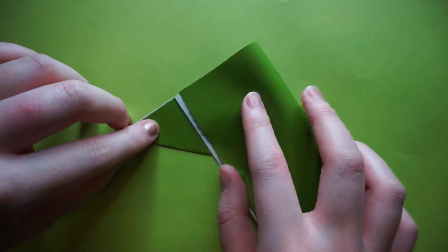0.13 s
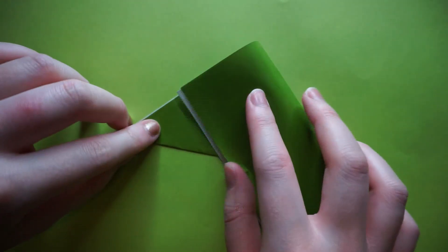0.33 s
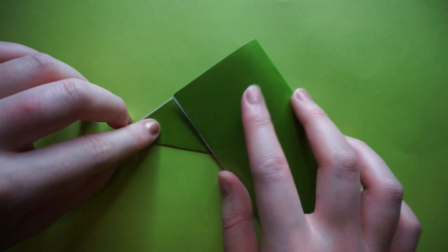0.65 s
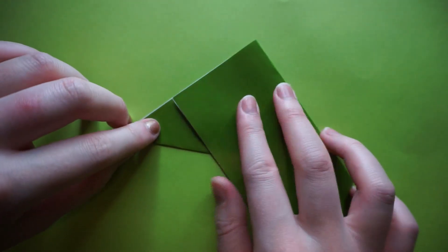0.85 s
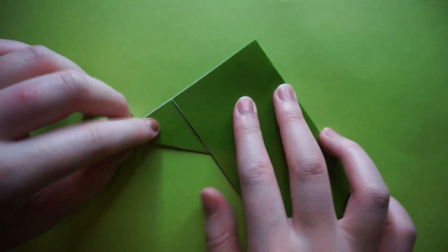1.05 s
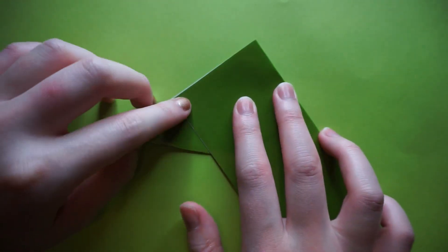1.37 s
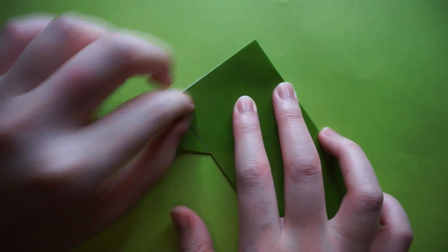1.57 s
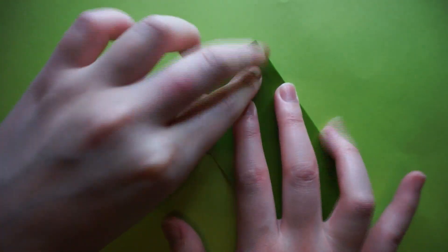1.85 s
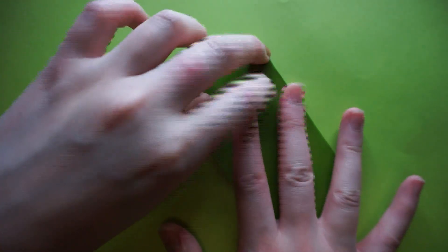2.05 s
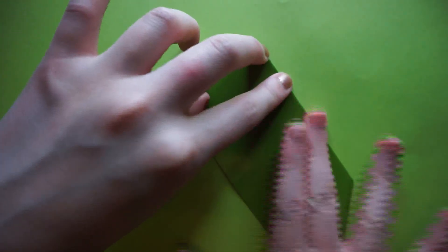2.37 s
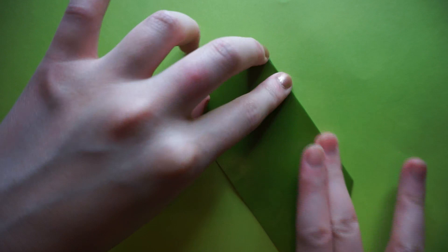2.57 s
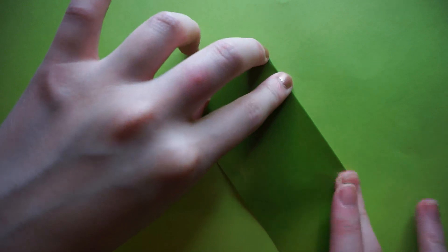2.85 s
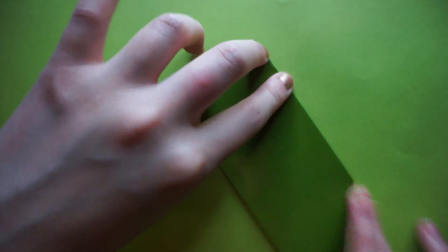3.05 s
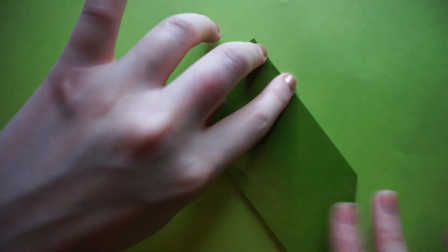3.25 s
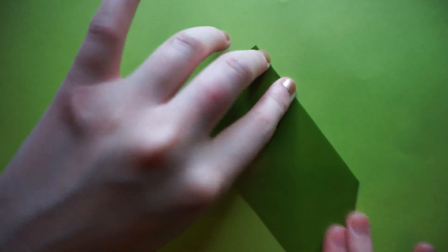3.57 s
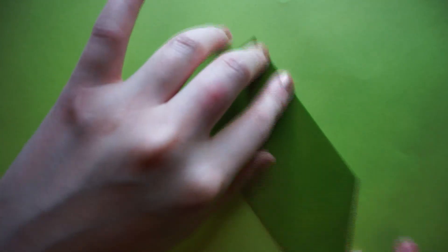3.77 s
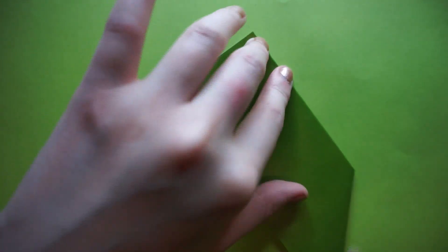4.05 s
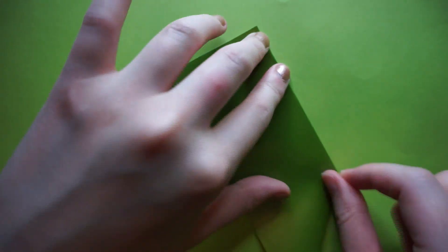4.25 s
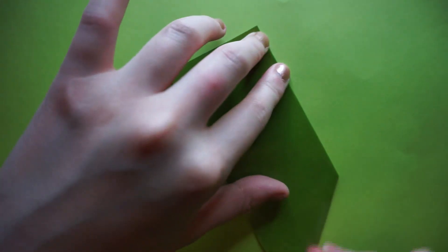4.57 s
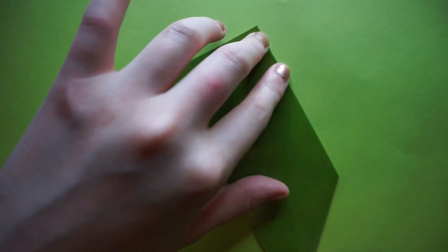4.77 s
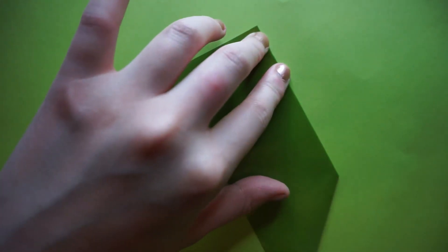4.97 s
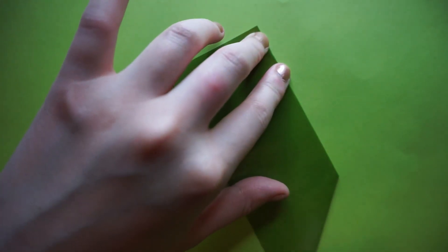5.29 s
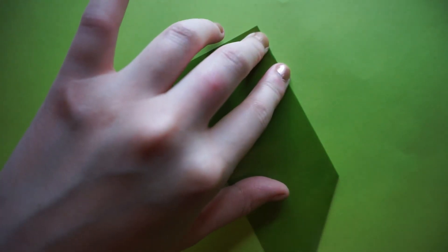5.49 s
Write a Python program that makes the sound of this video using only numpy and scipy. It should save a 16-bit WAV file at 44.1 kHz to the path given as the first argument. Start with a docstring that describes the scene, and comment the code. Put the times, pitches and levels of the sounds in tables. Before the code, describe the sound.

A quiet room with low steady hiss, heard close in stereo. From 0 to 0.8 s a paper flap drags in faint, grainy catches with small papery ticks, loudest near 0.6 s. Then it is almost still, with a tick at 1.15 s and a soft hiss swelling around 1.6 s. From 1.9 to 2.4 s fingers press: a cluster of dry ticks, dull low pats, the firmest at 2.16 s, short skin hisses and a sharp bright snap at 2.34 s. Hiss fades until brief brushes at 3.1 and 3.4 s. A rapid stutter at 3.45 s precedes the loud zip at 3.59-3.77 s, a ragged, buzzing nail scrape, starting squeaky and bright, dying dull. A thin rasp follows at 3.82 s. Soft slides, ticks at 4.23 s and breathy edge whistles from 4.3 to 4.9 s continue; sliding stops at 5.1 s, with a crisp tick and light pat at 5.31 s.

```python
"""Hands fold a sheet of origami paper on a table, close up in a quiet room, over a steady room tone.
First a flap is eased flat: it drags in tiny catches, and the paper ticks as it buckles.
Then skin hisses over the fibres, whistles faintly on the folded edge, and presses and pats the table.
After a few hesitant slips a fingernail runs once along the crease, sticking and slipping in a loud zip.
A fingertip brushes off its end in a bright rasp; more slides, edge whistles, ticks and pats follow."""
import sys
import numpy as np
from scipy import signal
from scipy.fft import rfft, irfft, next_fast_len
from scipy.io import wavfile

SR = 44100
rng = np.random.default_rng(int(sys.argv[2]) if len(sys.argv) > 2 else 0)


def pcm_store(signal):
    """Save signal as 16-bit PCM."""
    levels = np.round(np.clip(np.atleast_2d(signal), -1, 1) * 32767)
    wavfile.write(sys.argv[1], SR, levels.astype(np.int16).T)


N = 248283
TIME = np.arange(N) / SR

# resonances of the paper pocket under the flap: f/Hz, width/Hz, level/dB
POCKET_MODES = [(1680, 280, 0), (2650, 450, -2), (6000, 3000, -18), (8300, 900, -15)]
# modes of the table top, the first two being its thump: f/Hz, width/Hz, level/dB
TABLE_TOP = [(112, 40, 1), (147, 35, 4), (205, 35, 2), (260, 55, 2), (378, 55, -3), (470, 70, -15),
             (680, 110, -7), (1100, 600, -8)]
# treble colour of the sharp edge of each slip: f/Hz, relative density/dB per Hz
SLIP_COLOUR = [(70, -29), (700, -4), (2000, 5.5), (5900, 7), (6700, 15.5), (8000, 9), (9400, 6),
               (12900, 6.5), (14300, 1), (15500, -9)]
# the nail bites at the start of the crease, then comes to rest
NAIL_START_S, NAIL_STOP_S = 3.5885, 3.83


def from_db(db):
    """Decibels to gain."""
    return 10 ** (np.asarray(db) / 20)


def rms_one(x):
    """Scale to unit rms."""
    return x / np.sqrt(np.mean(x ** 2) + 1e-20)


def in_time(rows):
    """Each column of a curve, interpolated at every sample."""
    s, *columns = np.transpose(rows)
    return [np.interp(TIME, s, column) for column in columns]


def at_hz(points, hz):
    """Read a spectrum on a log-frequency axis."""
    f, value = np.transpose(points)
    return np.interp(np.log(np.maximum(hz, 1)), np.log(f), value)


def convolve(x, response):
    """Pass a sound through an impulse response, channel by channel."""
    return signal.fftconvolve(np.atleast_2d(x), np.atleast_2d(response), axes=-1)[:, :N]


def butter(x, order, hz, kind):
    """Butterworth filter: "low", "high" or "band"."""
    return signal.sosfilt(signal.butter(order, hz, kind, fs=SR, output="sos"), x)


def causal_filter(spectrum, size=1024):
    """Minimum-phase impulse response of unit energy with the given spectrum."""
    level_db = at_hz(spectrum, np.linspace(0, SR / 2, size + 1))
    cepstrum = irfft(np.log(from_db(level_db)))
    # folding the cepstrum forward in time makes the phase minimal
    cepstrum[1:size] *= 2
    cepstrum[size + 1:] = 0
    response = irfft(np.exp(rfft(cepstrum)))
    return response / np.linalg.norm(response)


def resonate(x, hz, width):
    """A two-pole resonance with unit gain on top."""
    r = np.exp(-np.pi * abs(width) / SR)
    zeros = np.array([1, 0, -1]) * (1 - r * r) / 2
    poles = [1, -(1 + r * r) * np.cos(2 * np.pi * hz / SR), r * r]
    return signal.lfilter(zeros, poles, x)


def body(modes, size=2048):
    """Unit-energy impulse response of parallel resonances."""
    click = signal.unit_impulse(size)
    response = sum(from_db(db) * resonate(click, hz, width) for hz, width, db in modes)
    return response / np.linalg.norm(response)


def drift(per_s):
    """Random wander of unit rms, with the given number of fresh values per second."""
    knots = rng.standard_normal(N // 4)
    return rms_one(np.interp(TIME * per_s, np.arange(len(knots)), knots))


def stereo_noise(spectrum):
    """Coloured noise of unit rms whose left-right likeness varies with pitch."""
    # left-right likeness of the steady noises: f/Hz, likeness (0-1)
    likeness = [(100, 0.89), (400, 0.09), (1200, 0.022), (4000, 0.2), (8000, 0.43), (13000, 0.29)]
    hz = np.linspace(0, SR / 2, next_fast_len(N, True) // 2 + 1)
    white = rng.standard_normal((2, 2 * len(hz) - 2))
    mid, side = rfft(white) * from_db(at_hz(spectrum, hz))
    alike = np.clip(at_hz(likeness, hz), 0, .99)
    both = np.sqrt(1 + alike) * mid + np.sqrt(1 - alike) * side * [[1], [-1]]
    return rms_one(irfft(both)[:, :N])


def pan(left_db):
    """Gains of the two channels; left_db is how far left stands above right."""
    return from_db(np.array([[left_db], [-left_db]]) / 2)


def swell(start_s, rise_s, length_s, fade_s=None):
    """Gain of one rub: it rises, holds to the end of its length, then falls 20 dB per fade time."""
    # by default the fade time is 36 ms plus a share of the rub's own length
    fade_s = fade_s or 0.036 + 0.79 * length_s
    age = TIME - start_s
    return np.clip(age / rise_s, 0, 1) * from_db(-20 * np.clip((age - length_s) / fade_s, 0, 10))


def table_rumble(band_hz):
    """Skin judders on the paper and keeps the modes of the table top murmuring; unit rms."""
    waver_db = 2.5
    force = butter(rng.standard_normal(N), 2, band_hz, "band")
    return rms_one(convolve(force * from_db(waver_db * drift(15)), body(TABLE_TOP)))


def room_tone(level_db):
    """Steady coloured noise of the quiet room."""
    # colour of the room tone: f/Hz, relative density/dB per Hz
    tone_colour = [(12, -64), (20, -26), (120, -6), (574, -9), (1440, -10), (3440, -13.5), (7730, -15.5),
                   (16000, -20)]
    return from_db(level_db) * stereo_noise(tone_colour)


def flap(grain_db, side_db):
    """The flap drags on the layer below in tiny catches that ring the pocket of paper under it."""
    # rubs of the flap: start t/s, length/s, level/dB
    flap_rubs = [(0.0, 0.032, -58.5), (0.044, 0.048, -59), (0.167, 0.022, -60), (0.268, 0.024, -62),
                 (0.307, 0.021, -53.5), (0.501, 0.1, -59.5), (0.726, 0.13, -67.5)]
    rise_share, fade_s = 0.38, 0.035
    # the upper resonances grow relative to the lowest as the flap closes
    upper_db, upper_db_per_s = -13.5, 22
    drag = sum(from_db(db) * swell(s, rise_share * length, length, fade_s)
               for s, length, db in flap_rubs)
    catches = drag * rng.standard_normal(N) * rms_one(from_db(grain_db * drift(350)))
    last_rub_s = flap_rubs[-1][0]
    upper = from_db(upper_db + upper_db_per_s * np.minimum(TIME, last_rub_s))
    lowest_ring = convolve(catches, body(POCKET_MODES[:1]))
    upper_ring = convolve(catches * upper, body(POCKET_MODES[1:]))
    return (lowest_ring + upper_ring) / np.hypot(1, upper) * pan(side_db)


def ticks(settle_s, rattle, spread, crack, level_db, size=1024):
    """A buckle snaps, rattles for a millisecond at its own pitch and rings the pocket under the flap."""
    # paper buckling and snapping: t/s, level over a millisecond/dB before level_db, ring f/Hz,
    # nominal ring width/Hz, left over right/dB, pocket ring relative to the snap/dB
    snaps = [(0.099, -40, 2160, 1000, -2, 2), (0.3382, -40.5, 1770, 200, -2, -11),
             (0.4735, -47, 1900, 900, 0, -16), (0.5782, -38, 4450, 5500, -7, -1.5),
             (0.605, -33.5, 1690, 900, -6, 2), (0.6067, -38.5, 7050, 2500, -4, 4),
             (0.747, -46, 2840, 1300, -10, -11), (1.148, -29.5, 7600, 3540, -7.5, -15.5),
             (1.653, -40.5, 1880, 970, 2, -25), (1.826, -33, 6850, 1900, -5, -41),
             (1.9096, -40, 3930, 2500, 2, -4), (1.9806, -35.5, 4000, 1800, 7, -15),
             (1.986, -38, 4330, 1600, -8, -11), (2.006, -35, 3960, 2700, -1, -10),
             (2.017, -34, 4050, 3020, -1, -16), (2.044, -35, 5530, 3000, 0, -3.5),
             (2.076, -31.5, 5100, 3060, -2, -1.5), (2.246, -39, 5800, 3000, 1, -3.5),
             (2.2905, -47.5, 6250, 4160, -4, 1), (2.3364, -18, 6200, 2000, -2, -34),
             (3.245, -35.5, 4120, 1500, 2, -16.5), (3.406, -31, 2800, 2420, -1.5, -11),
             (3.5278, -33.5, 7800, 6400, -3, -3.5), (4.226, -27.5, 6300, 1160, 1, -20),
             (4.2354, -31, 5060, 3100, -3, -5.5), (5.3097, -26, 11700, 2600, -4.5, -15.5),
             (5.3098, -31, 6800, 4000, -1, -38), (5.3182, -33, 6040, 3600, 3, -9)]
    out, age = np.zeros((2, N + size)), np.arange(size) / SR
    pocket = body(POCKET_MODES)
    for s, db, hz, width, side_db, pocket_db in snaps:
        shared, *own = rng.standard_normal((3, size))
        rattling = (shared + spread * np.array(own)) * np.exp(-age / settle_s)
        kick = signal.unit_impulse(size) + rattle * rattling
        ring = resonate(resonate(kick, hz, 0.95 * width), hz, 6 * width)
        snap = rms_one(ring + crack * kick)
        snap = snap + from_db(pocket_db) * rms_one(convolve(kick, pocket)[:, :size])
        # the level counts over one millisecond
        gain = from_db(db + level_db) * pan(side_db) * np.sqrt(SR / 1000 / size)
        start = int(s * SR)
        out[:, start:start + size] += gain * snap
    return out[:, :N]


def fibre_catches():
    """Single fibres catch in tiny random clicks, mostly small and now and then larger; unit rms."""
    per_s, spread_db = 900, 4.5
    sizes = from_db(spread_db * np.minimum(rng.exponential(1, N), 4))
    signs = rng.choice([-1, 1], N)
    return rms_one(sizes * signs * (rng.random(N) < per_s / SR))


def fingers(sheen_side_db):
    """Skin catches on paper fibres: a grainy hiss above, the table's rumble below."""
    # fingers sliding on paper: start t/s, rise/s, length/s, hiss level/dB,
    # top octave relative to the hiss/dB, table rumble level/dB
    slides = [(1.01, .005, 0.11, -63, -1, -93), (1.532, 0.16, 0.18, -56, -2.5, -66),
              (1.888, 0.025, 0.22, -59, -6, -75), (2.166, 0.017, 0.013, -46, -7.5, -53),
              (2.222, 0.0042, 0.015, -48, -8, -53), (2.28, 0.0076, 0.048, -49.5, -6.5, -62),
              (2.323, 0.017, 0.078, -44, -2, -80), (2.394, 0.035, 0.13, -51.5, -3.5, -64.5),
              (2.601, 0.029, 0.21, -58.5, -3, -64.5), (2.975, 0.027, 0.17, -65, -4, -69),
              (3.109, 0.011, .012, -45, 1.5, -60), (3.353, 0.013, 0.039, -49.5, -5, -62.5),
              (3.429, 0.011, 0.1, -49, -5, -55), (3.538, 0.11, 0.038, -33.5, -7, -53),
              (3.892, 0.01, 0.11, -53, -3, -65.5), (4.156, 0.0045, 0.05, -51.5, 1.5, -71),
              (4.22, 0.0099, 0.04, -46, -3.5, -72), (4.279, 0.17, 0.37, -54, -3, -69),
              (4.633, 0.15, 0.14, -58.5, 9, -71), (4.826, 0.028, 0.098, -54.5, -4, -70),
              (4.959, 0.048, 0.15, -56, 1, -70.5), (5.083, 0.0025, 0.029, -46.5, -1, -83),
              (5.328, 0.068, 0.11, -60.5, -2, -79)]
    # colour of skin on paper: f/Hz, relative density/dB per Hz
    hiss_colour = [(500, -11), (1100, -7.5), (2000, -6.5), (3000, -6.5), (3900, -2.5), (5400, -2),
                   (6800, 3), (7800, 3.5), (9000, -9.5), (11000, -18), (15000, -62)]
    # colour of its top octave: f/Hz, relative density/dB per Hz
    sheen_colour = [(7000, -68), (9500, -7.5), (11000, -4), (13200, -2), (16000, -12)]
    # the sliding finger leaves the paper, and its hiss and rumble stop quickly
    lift_s, lift_fade_s = 5.1, .006
    flutter_db, wander_db, fibre_db = .9, .9, -4
    power = np.zeros((3, N))
    lifted = np.exp(-np.maximum(TIME - lift_s, 0) / lift_fade_s)
    for s, rise, length, hiss_db, top_db, rumble_db in slides:
        gain = swell(s, rise, length) * (lifted if s < lift_s else 1)
        power += np.outer(from_db([hiss_db, hiss_db + top_db, rumble_db]), gain) ** 2
    hiss, sheen, rumble = np.sqrt(power)
    # the hiss flutters quickly and wanders slowly
    grip = rms_one(from_db(flutter_db * drift(90) + wander_db * drift(22)))
    catches = from_db(fibre_db) * fibre_catches()
    low, high = (rms_one(stereo_noise(colour) + convolve(catches, causal_filter(colour)))
                 for colour in (hiss_colour, sheen_colour))
    friction = grip * (hiss * low + sheen * high * pan(sheen_side_db))
    return friction + rumble * table_rumble(band_hz=(240, 520))


def edge(width_hz, side_db):
    """Skin on the folded edge excites a narrow paper resonance, at a pitch that depends on the spot."""
    # faint whistles of the edge: start t/s, rise/s, length/s, level/dB, f/Hz
    edge_rubs = [(1.012, 0.01, 0.16, -69, 7800), (4.33, 0.18, 0.19, -53.5, 6640),
                 (4.476, 0.1, 0.095, -56, 7700), (4.648, 0.022, 0.027, -54, 7100),
                 (4.816, 0.059, 0.053, -49.5, 7000)]
    out = 0
    for s, rise, length, db, hz in edge_rubs:
        mid, side = resonate(rng.standard_normal((2, N)), hz, width_hz)
        whistle = rms_one(mid + 0.1 * side * np.array([[1], [-1]]))
        out = out + from_db(db) * swell(s, rise, length) * whistle
    return out * pan(side_db)


def presses():
    """The shifting weight of heel and fingers keeps the table rumbling between pats."""
    # shifts of the hand's weight: start t/s, rise/s, length/s, level/dB
    weight_shifts = [(1.905, .01, 0.023, -56), (1.992, 0.011, 0.047, -55.5), (2.048, 0.022, 0.085, -64),
                     (2.181, .01, 0.078, -58.5)]
    weight = sum(from_db(db) * swell(s, rise, length) for s, rise, length, db in weight_shifts)
    return weight * table_rumble(band_hz=(75, 380))


def pats(push, size=8192):
    """A fingertip gives the table top one soft push, then settles against it."""
    # fingertips landing: t/s, level over the decay time/dB, decay time/s,
    # brightness f/Hz, extra level of the low thump modes/dB
    landings = [(1.91, -47, 0.012, 554, 6), (1.981, -50.5, 0.025, 367, 14), (2.012, -49, 0.0082, 650, 0),
                (2.083, -50.5, 0.02, 860, -5), (2.164, -36, 0.0073, 386, 3), (2.335, -48, 0.0083, 600, 5),
                (3.37, -50.5, 0.01, 450, -11), (3.593, -36.5, 0.0027, 560, -14),
                (3.817, -45.5, 0.01, 382, -11), (4.2352, -55, 0.0052, 1600, 6),
                (5.312, -56, 0.0087, 1200, -7), (5.3203, -44, 0.011, 2020, 4)]
    # the table top radiates little below this
    low_hz = 65
    out, age = np.zeros(N + size), np.arange(size) / SR
    for s, db, decay_s, bright_hz, thump_db in landings:
        settling = rng.standard_normal(size) * np.exp(-age / decay_s)
        force = push * signal.unit_impulse(size) + settling / np.linalg.norm(settling)
        force = butter(force, 2, [low_hz, max(bright_hz, 2 * low_hz)], "band")
        thud = sum(from_db(mode_db + thump_db * (k < 2)) * resonate(force, hz, width)
                   for k, (hz, width, mode_db) in enumerate(TABLE_TOP))
        start = int(s * SR)
        out[start:start + size] += from_db(db) * thud / np.linalg.norm(thud) * np.sqrt(decay_s * SR)
    return out[:N]


def sheet(kicks, size=2048):
    """The sheet rings under the nail; its resonances trade strength as the nail travels the crease."""
    # the sheet pressed on the table: f/Hz, width/Hz, then level/dB at the start of the crease,
    # level/dB halfway, level/dB at its end
    sheet_modes = [(237, 74, -4, 2, 7), (393, 63, 6, 0.5, -7.5), (686, 89, 6.5, 7.5, 8.5),
                   (946, 95, -4, -2, 14), (1238, 240, 7, 11.5, 11.5), (1690, 250, 1.5, 5.5, 11),
                   (2170, 410, 7.5, 4, -1), (2820, 400, -16, -4, -8), (3620, 260, 3, 4.5, 14),
                   (4260, 120, 2, 9, -10), (5030, 320, 2, 2, -23)]
    travel_s = .17
    along = (TIME - NAIL_START_S) / travel_s
    click = signal.unit_impulse(size)
    average = sum(from_db(np.mean(dbs)) * resonate(click, hz, width) for hz, width, *dbs in sheet_modes)
    rings = 0
    for hz, width, *dbs in sheet_modes:
        drive = kicks * from_db(np.interp(along, [0, .5, 1], dbs))
        rings = rings + resonate(drive + 1e-18, hz, width)
    return rings / np.linalg.norm(average)


def stutter(settle_s, spread, count=7, size=256):
    """First hesitant slips as the nail sets off: short scrapes, ever wider apart and louder."""
    start_s, gap_s, slowing = 3.4422, .0043, .04
    first_db, growth_db = -33.5, 1.05
    out, age = np.zeros((2, N)), np.arange(size) / SR
    for k in range(count):
        shared, *own = rng.standard_normal((3, size))
        burst = (shared + spread * np.array(own)) * np.exp(-age / settle_s)
        start = int((start_s + k * gap_s * (1 + slowing * k)) * SR)
        # the level counts over one millisecond
        gain = from_db(first_db + k * growth_db) * np.sqrt(SR / 1000 / size)
        out[:, start:start + size] += gain * rms_one(burst)
    return convolve(out, causal_filter(SLIP_COLOUR)) + from_db(-7) * sheet(out)


def disperse(x, lag_s, size=512):
    """Bending waves run faster at high pitch: a click becomes a short falling chirp, lag_s late at 1 kHz."""
    khz = np.linspace(0, SR / 2000, size + 1)
    phase = 4000 * np.pi * lag_s * np.sqrt(khz)
    return convolve(x, irfft(np.exp(-1j * phase))[:size])


def crease(strength_db, release_s, scrape_grit, spread, lag_s):
    """The nail sticks and slips; each slip kicks the sheet and sheds a brief puff of friction."""
    # stick-slip rate of the nail: t/s, rate/slips per s before scatter
    slip_rate = [(3.586, 340), (3.601, 630), (3.628, 720), (3.645, 660), (3.659, 450), (3.671, 380),
                 (3.677, 205), (3.688, 202), (3.701, 245), (3.708, 380), (3.736, 470), (3.762, 680)]
    # stroke levels before the layer trims: t/s, midrange/dB, 7 kHz band/dB, treble/dB
    stroke_levels = [(3.592, -31.5, -41, -27), (3.602, -32.5, -27, -26.5), (3.626, -33, -32, -32),
                     (3.642, -30, -54, -44), (3.668, -30, -64, -33), (3.682, -30, -52, -35.5),
                     (3.699, -29, -47, -32), (3.709, -28.5, -48, -32), (3.735, -30, -51, -36),
                     (3.75, -33, -48, -33.5), (3.762, -37.5, -36, -36), (3.772, -40.5, -61, -68),
                     (3.81, -57, -52, -70)]
    # resonances of the squeak: f/Hz, width/Hz, level/dB
    squeak_modes = [(7050, 430, 0), (7750, 430, -1)]
    sheet_trim_db, scrape_trim_db = 1, 3
    firm_scatter, light_scatter = .026, .4  # timing scatter as the nail bites, and as it comes to rest
    friction = .4  # friction noise in each kick relative to the slip
    buzz_db = -12.5  # relative to the kicks
    soft_range_db, soft_kick_hz = 12, 1900
    per_s, = in_time(slip_rate)
    mid_db, squeak_db, treble_db = in_time(stroke_levels)
    moving = (TIME > NAIL_START_S) & (TIME < NAIL_STOP_S)

    # the slips start as an even buzz and grow ragged along the way
    progress = np.clip((TIME - NAIL_START_S) / (NAIL_STOP_S - NAIL_START_S), 0, 1)
    scatter = firm_scatter * (light_scatter / firm_scatter) ** progress
    cycles = np.cumsum(moving * per_s * np.exp(scatter * drift(600))) / SR
    strength = from_db(strength_db * drift(500))
    # one click wherever a new cycle begins
    clicks = np.diff(np.ceil(cycles), prepend=0)
    slips = disperse(clicks * np.sqrt(SR / per_s) * strength, lag_s)
    since_slip_s = (cycles % 1) / per_s
    puffs = moving * np.exp(-since_slip_s / release_s) * np.sqrt(2 / (per_s * release_s)) * strength
    noise = rng.standard_normal(N) + spread * rng.standard_normal((2, N))
    grit = noise / np.hypot(1, spread) * puffs
    kicks = (slips + friction * grit) / np.hypot(1, friction)

    # a light touch also kicks more softly, so the stroke dies away dull
    touch_db = np.maximum(mid_db, treble_db)
    soft = np.clip((touch_db.max() - touch_db) / soft_range_db, 0, 1)
    dull = butter(kicks, 2, soft_kick_hz, "low")
    kicks = (1 - soft ** 2) * kicks + soft ** 2 * dull
    # paper fibres roughen only the treble of each slip
    fibres = butter(grit, 2, 3000, "high")
    edges = (slips + scrape_grit * fibres) / np.hypot(1, scrape_grit)
    # the nail itself rocks once per slip, a buzz that glides with the slip rate
    buzz = moving * np.sin(2 * np.pi * cycles) * strength * from_db(buzz_db)

    ringing = sheet((kicks + buzz) * from_db(mid_db + sheet_trim_db))
    squeak_drive = butter(edges * from_db(squeak_db) + 1e-18, 2, (6400, 8300), "band")
    squeak = convolve(squeak_drive, body(squeak_modes))
    scrape = convolve(edges * from_db(treble_db + scrape_trim_db), causal_filter(SLIP_COLOUR))
    stroke = ringing * pan(-0.39) + squeak * pan(-1.1) + scrape * pan(-0.17)
    # a hollow between two of the sheet's resonances
    stroke = stroke - 0.62 * resonate(stroke, hz=530, width=140)
    # a small sheet radiates no deep bass
    return butter(stroke, 4, 110, "high")


def brush(grain_db):
    """A thin, bright rasp as the fingertip runs off the end of the crease."""
    # colour of the rasp: f/Hz, relative density/dB per Hz
    rasp_colour = [(100, -29.5), (250, -5.5), (2800, -29), (4400, -6.5), (8000, -3.5), (9000, -8.5),
                   (16000, -17)]
    gain = from_db(-33) * swell(start_s=3.8175, rise_s=.005, length_s=.01, fade_s=.048)
    grain = rms_one(from_db(grain_db * drift(730)))
    return gain * grain * stereo_noise(rasp_colour)


def room(x, t60, wet_db, near_s, near_db, size=16384):
    """Quick reflections from hands and table, then the short tail of a furnished room."""
    # colour of the room's reflections: f/Hz, level/dB
    wall_colour = [(100, 9.5), (500, 4.5), (1300, 5.5), (2400, 6.5), (3300, 5), (4800, 2.5), (8000, -0.5),
                   (15000, 3.5)]
    age = np.arange(size) / SR
    near, far = rng.standard_normal((2, 2, size))
    near = near * np.exp(-age / near_s) * (age > .0006)
    far = far * from_db(-60 * age / t60) * (age > .005)
    far = convolve(far, causal_filter(wall_colour))[:, :size]
    response = (from_db(near_db) * rms_one(near) + from_db(wet_db) * rms_one(far)) / np.sqrt(size)
    # long waves reach both sides alike
    mid, side = (response[0] + response[1]) / 2, (response[0] - response[1]) / 2
    side = butter(side, 2, 400, "high")
    return x + convolve(x, [mid + side, mid - side])


def scene():
    """Paper, fingers and table over the room tone; only the contacts carry reflections."""
    contacts = (flap(grain_db=0.5, side_db=-1.5)
                + ticks(settle_s=0.0012, rattle=0.46, spread=0.63, crack=0.14, level_db=-3.0)
                + pats(push=0.36)
                + stutter(settle_s=0.0012, spread=0.64)
                + crease(strength_db=0.8, release_s=.0015, scrape_grit=1.8, spread=0.77, lag_s=0.000942))
    rubbing = (fingers(sheen_side_db=-3.0)
               + edge(width_hz=480, side_db=1.0)
               + presses()
               + brush(grain_db=-0.5))
    reflected = room(contacts, t60=0.35, wet_db=-9.5, near_s=.0045, near_db=-11.5)
    return room_tone(level_db=-61.5) + reflected + rubbing


def record(dry, right_lag_s=.000013, cutoff_hz=16100):
    """Sound reaches the right side a moment after the left; the top is cut steeply."""
    size = next_fast_len(N, True)
    hz = np.arange(size // 2 + 1) * SR / size
    delay = np.exp(-2j * np.pi * hz * right_lag_s)
    right = irfft(rfft(dry[1], size) * delay, size)[:N]
    steep_cut = signal.ellip(10, .1, 80, cutoff_hz, fs=SR, output="sos")
    return signal.sosfilt(steep_cut, np.array([dry[0], right]))


dry = scene()
out = record(dry)
pcm_store(out)
```